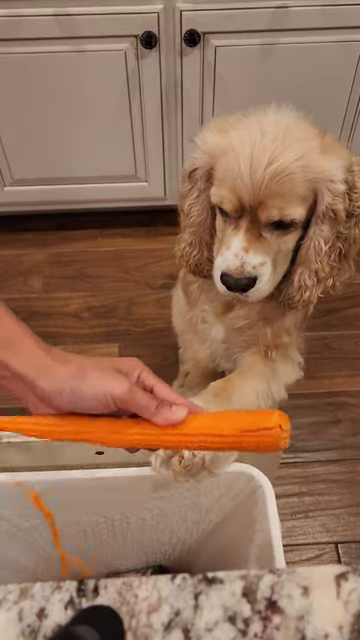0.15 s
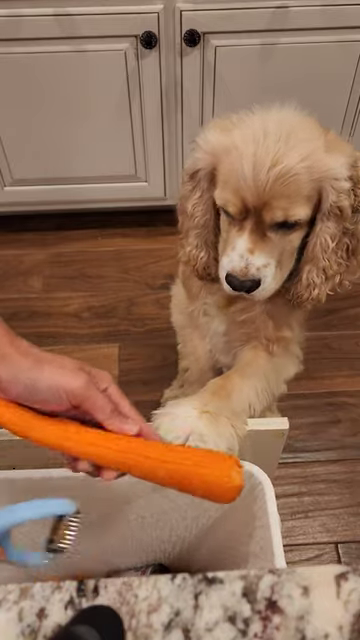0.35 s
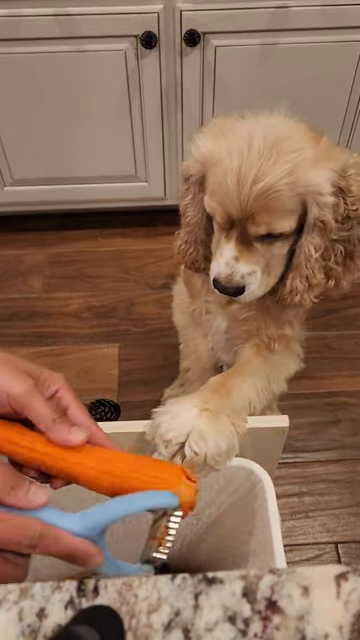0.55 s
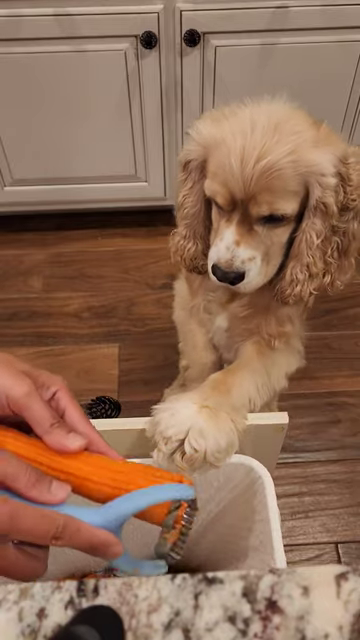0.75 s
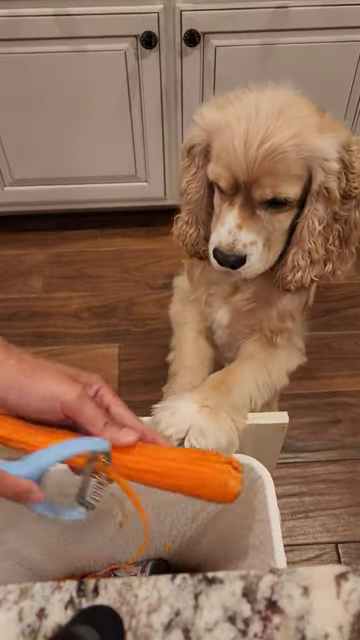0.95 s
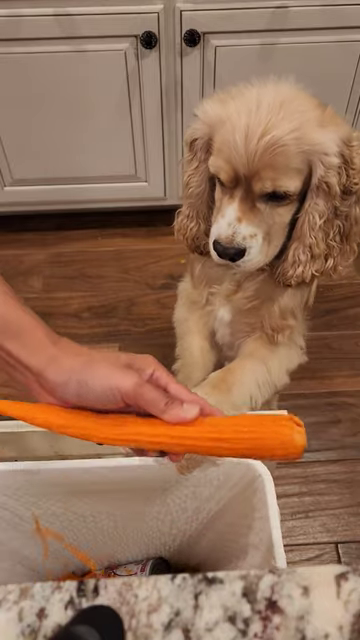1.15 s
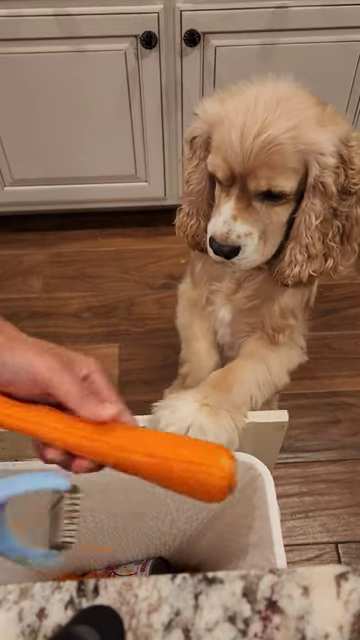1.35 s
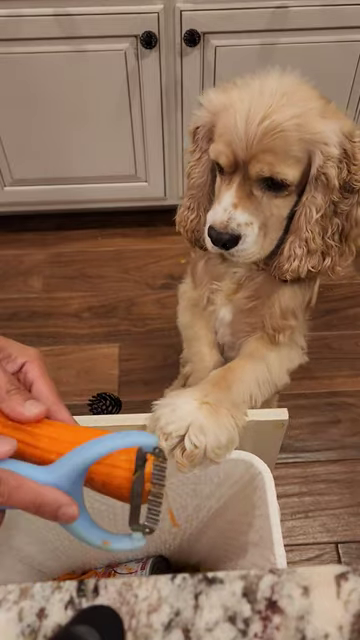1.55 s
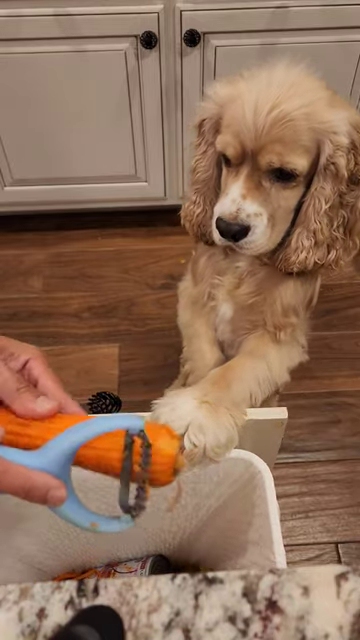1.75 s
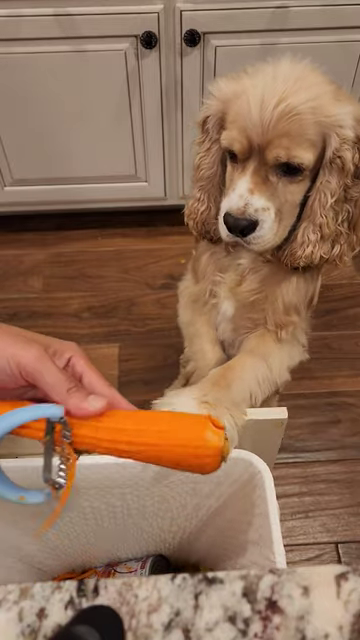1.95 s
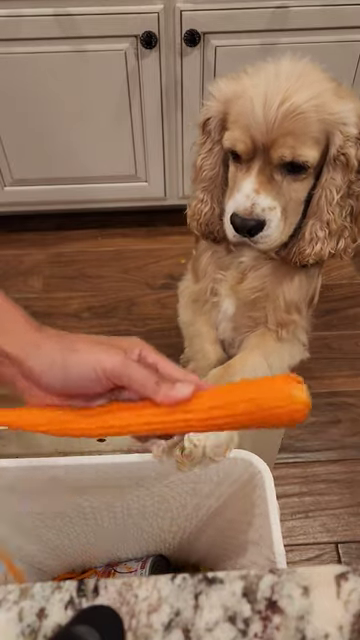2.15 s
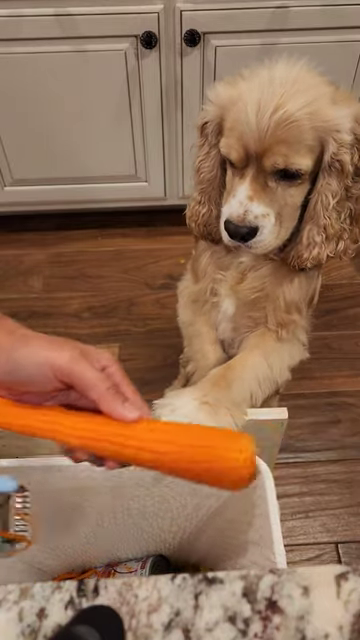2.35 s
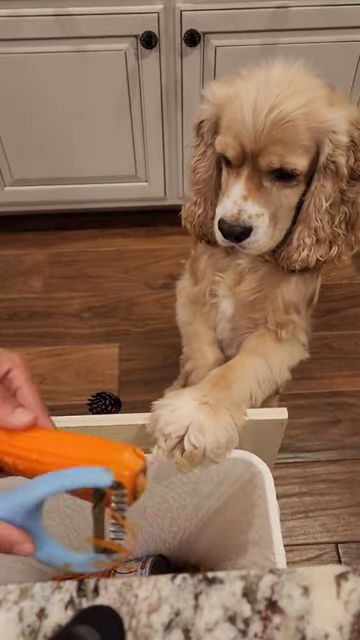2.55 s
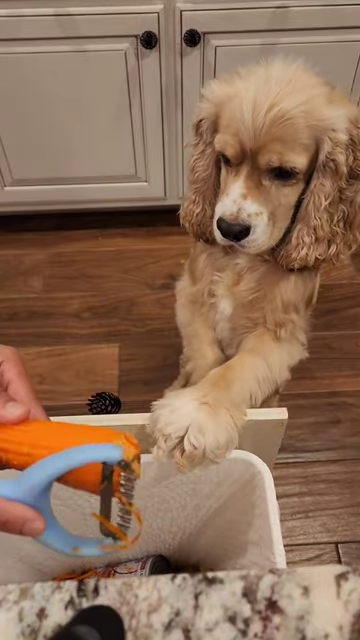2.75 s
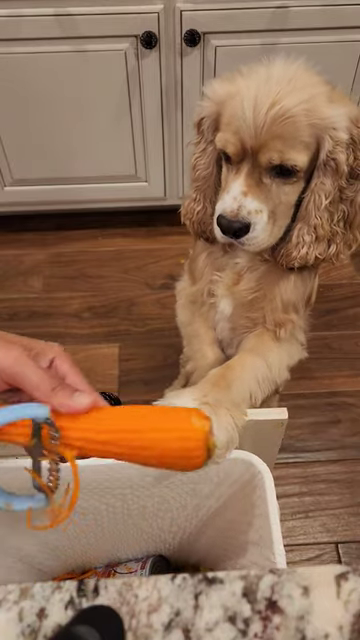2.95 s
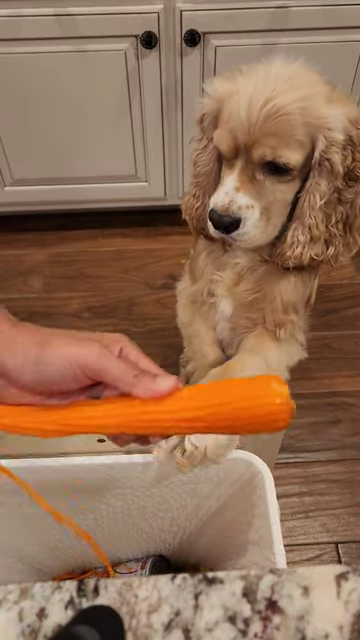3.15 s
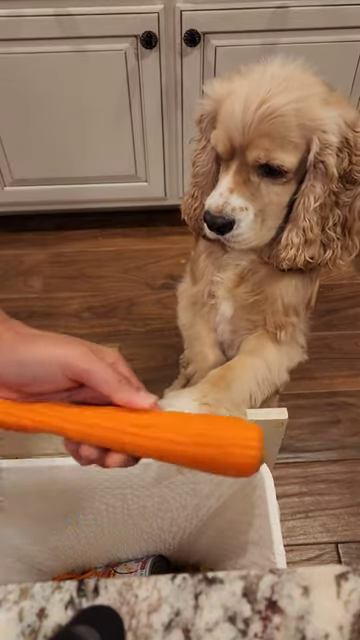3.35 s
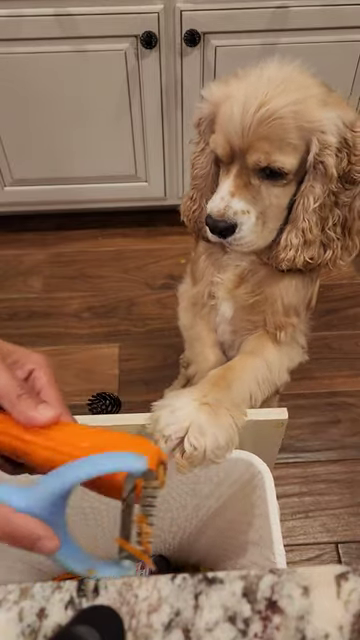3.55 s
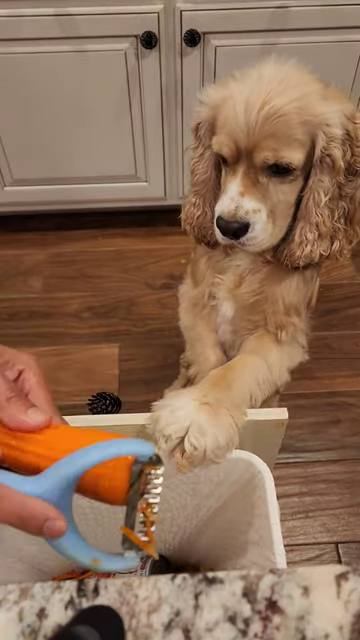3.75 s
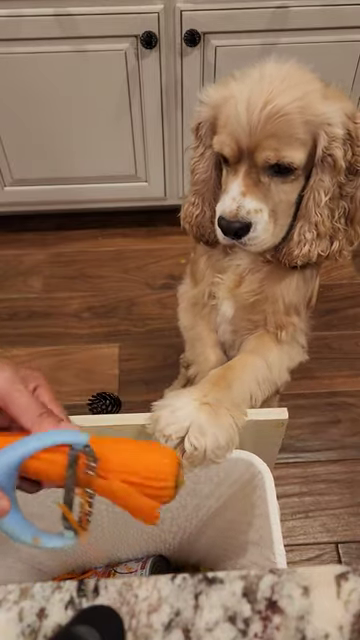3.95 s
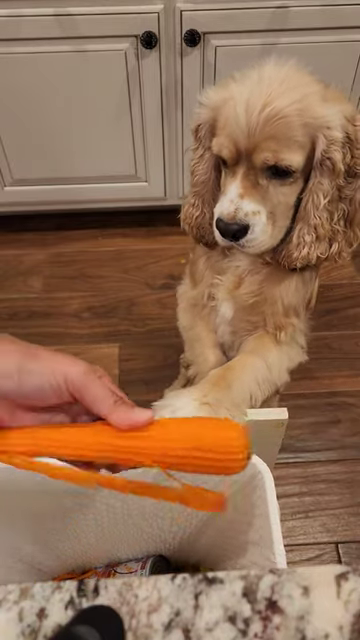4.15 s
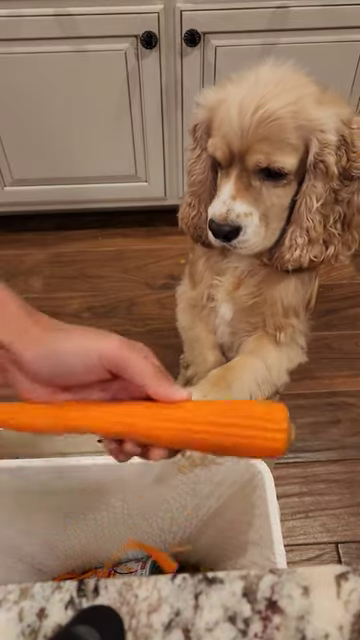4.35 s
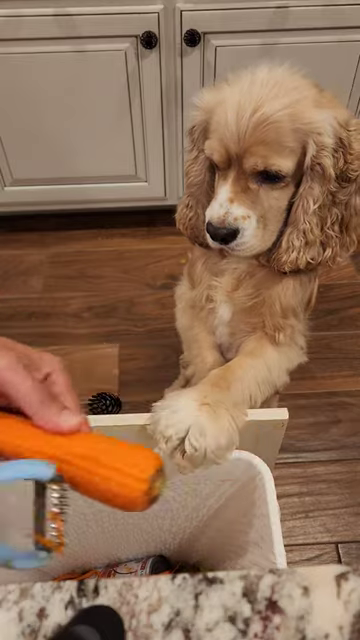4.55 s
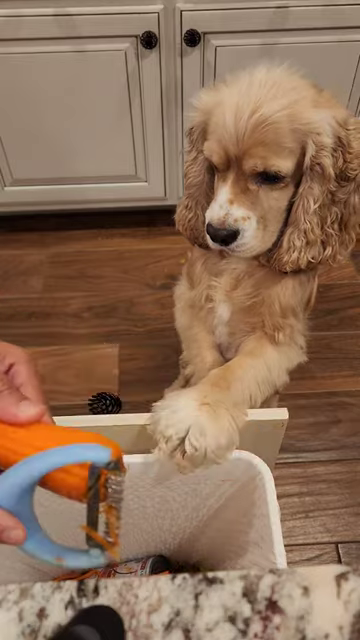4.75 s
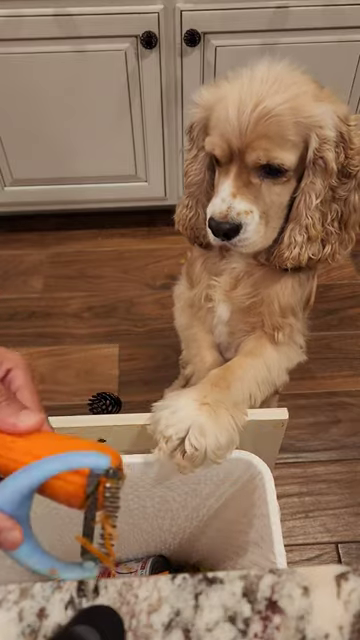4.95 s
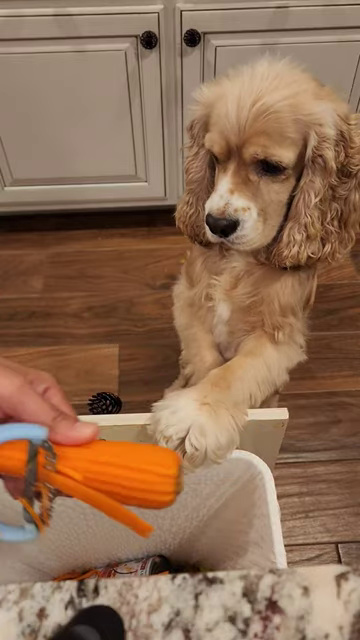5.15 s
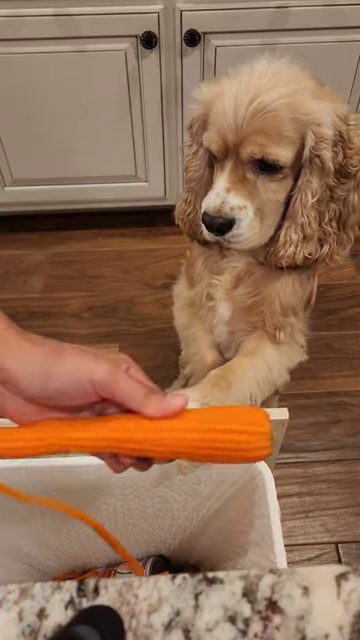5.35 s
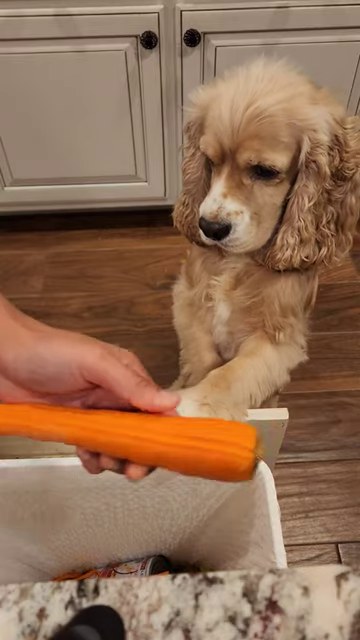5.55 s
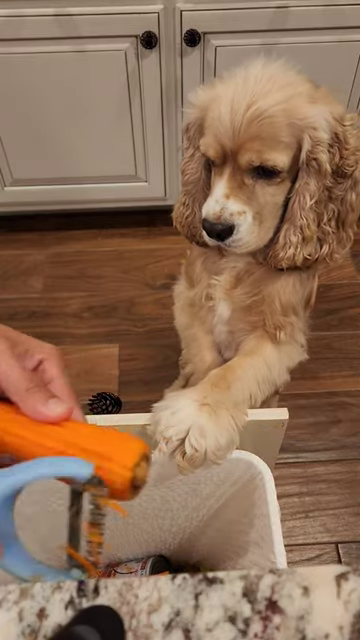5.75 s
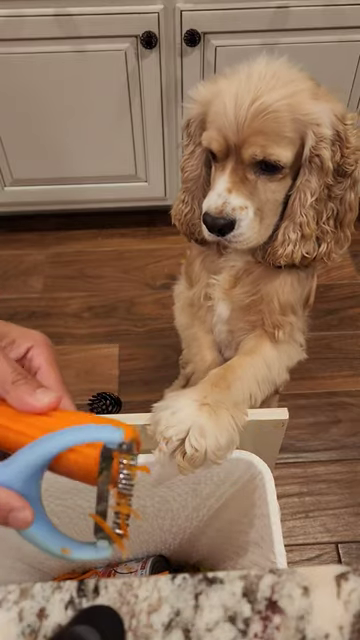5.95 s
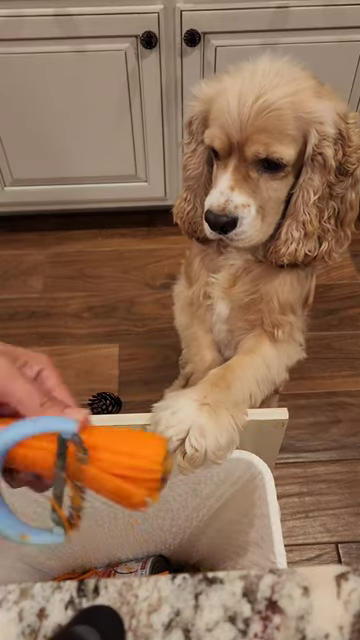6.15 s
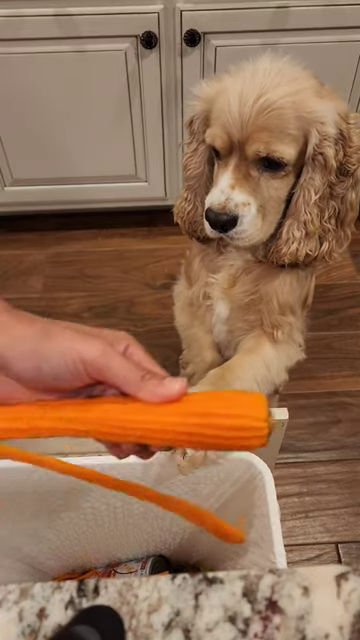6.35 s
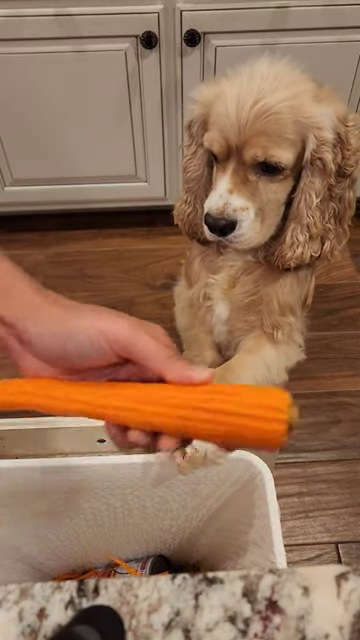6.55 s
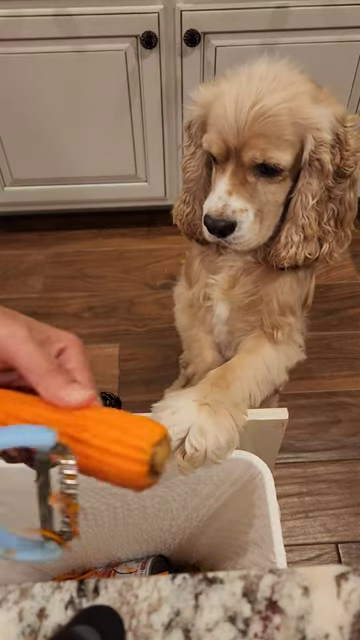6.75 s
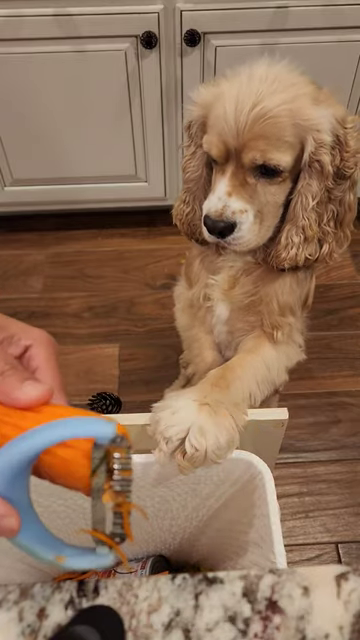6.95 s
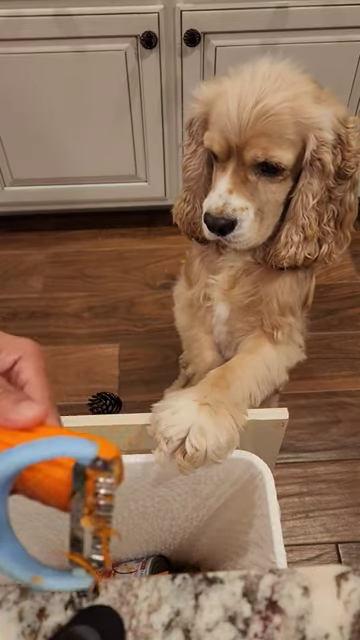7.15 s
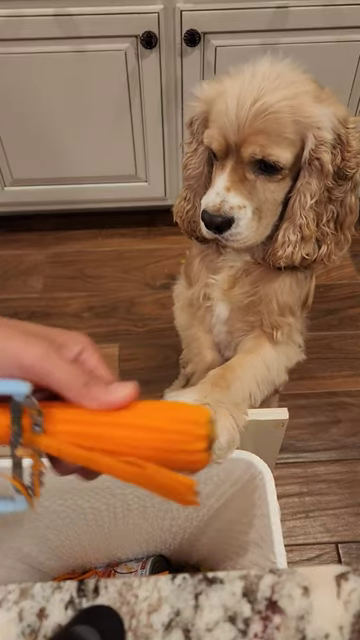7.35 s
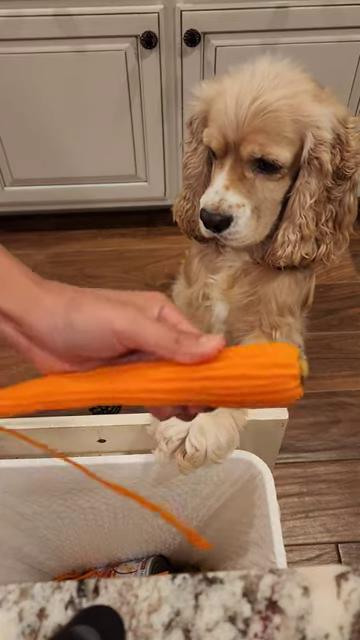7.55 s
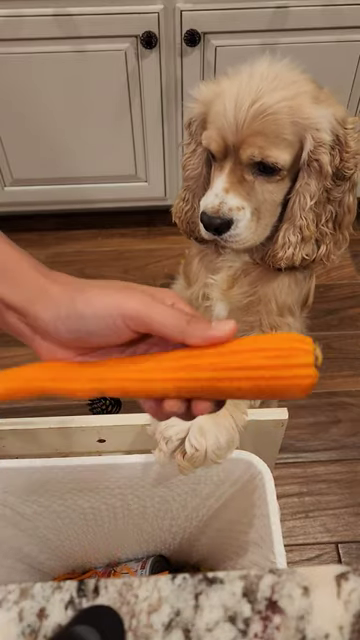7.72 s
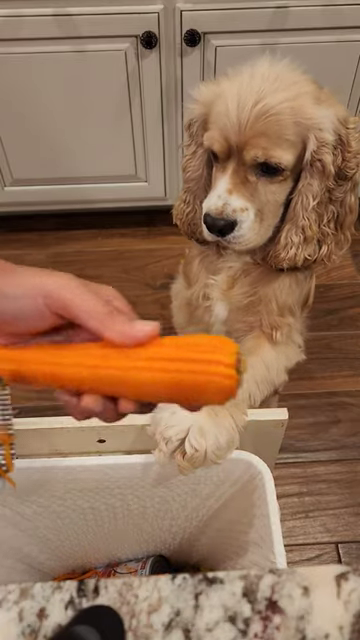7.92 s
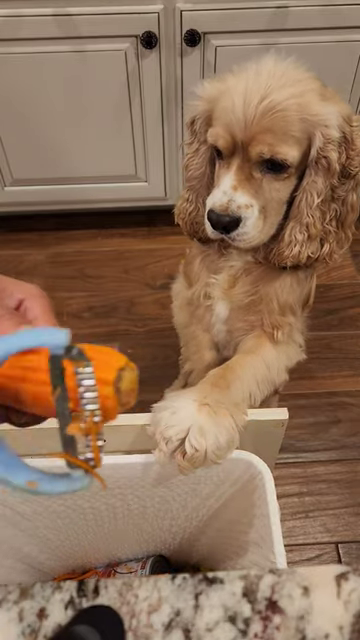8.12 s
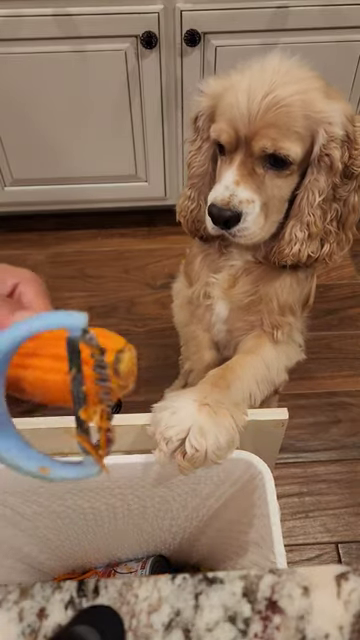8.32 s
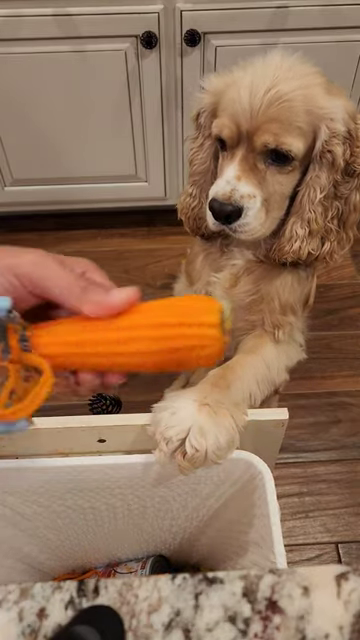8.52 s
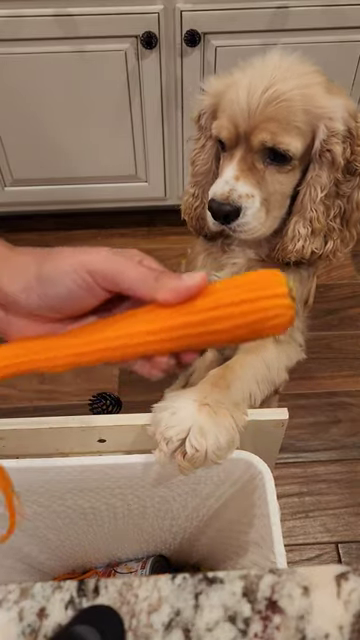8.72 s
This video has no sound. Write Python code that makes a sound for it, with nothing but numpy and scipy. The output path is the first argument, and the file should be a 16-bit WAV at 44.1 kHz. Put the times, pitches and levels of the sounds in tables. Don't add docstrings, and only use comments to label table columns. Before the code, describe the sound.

Dry, bright, crackly peeling strokes repeat steadily, each about a third of a second, separated by quiet gaps. The metal blade clicks as it lands, tough fibres snap, and strips brush or flick the plastic bin. Hollow wooden paw taps and claw slips come irregularly, and one dish sounds faintly far off. Recorded close on a stereo phone, slightly stronger on the left, in a lightly reverberant kitchen with very low hum.

```python
import sys
import numpy as np
from scipy import signal
from scipy.fft import rfft, irfft, next_fast_len
from scipy.io import wavfile
from scipy.ndimage import uniform_filter1d, map_coordinates

SR = 44100
rng = np.random.default_rng(int(sys.argv[2]) if len(sys.argv) > 2 else 0)


def to_wav(s):
    ch = np.atleast_2d(s).T
    pcm = np.round(np.clip(ch, -1, 1) * 32767)
    wavfile.write(sys.argv[1], SR, pcm.astype(np.int16))


def elevation(decibels):
    levels = np.asarray(decibels, float)
    return 10 ** (levels / 20)


N = 387198
SIDES = np.array([[1], [-1]])

# f/Hz, level/dB rms
HUM_LINES = [(80.7, -55.5), (113.0, -70)]
SHAFT_HZ, SHAFT_DB = 41, -71
# f/Hz, level/dB per Hz
AIR_SPECTRUM = [(12, -41.5), (20, -8.5), (61, -8), (91, -1), (130, 0), (293, -12), (388, -24.5),
                (759, -32.5), (873, -28), (8890, -36.5), (10800, -60), (14700, -45), (16000, -67)]
AIR_DB = -62
# t/s, peak level/dB, fall/dB per s
BUMPS = [
    (0.14, -49.5, 54),
    (1.49, -54, 50),
    (3.54, -59.5, 38),
    (3.79, -45.5, 500),
    (4.01, -57, 33),
    (4.65, -56.5, 55),
    (5.87, -53, 110),
    (6.02, -55.5, 120),
    (7.43, -43, 186.5),
    (8.7, -58, 97),
]
HANDS_DB, BUMP_RISE = -61, 1.4

ROOM_DB, ROOM_T60_S, ROOM_TREBLE_T60_S, ROOM_SPLIT_HZ = -8, 0.64, 0.24, 2300
RASP_SEND_DB, PANEL_SEND_DB = -3.5, -8
# left delay/ms, right delay/ms, level/dB
NEAR_ECHOES = [(.09, 0.2, -9.5), (.5, .33, -32.5)]
TOP_HZ = 15150

# f/Hz, level/dB, t60/s
DISH_MODES = [(285, 9, 0.535), (448, -2, 0.17), (515, 2, 0.25), (878, 2, 0.19), (1290, 1, 0.28),
              (1920, -13, 5.0)]
DISH_S, DISH_DB = 4.58, -56

# t/s, peak level/dB, panel f/Hz, contact/ms
MIDDLE_KNOCKS = [(0.5077, -42.5, 1180, 6.9), (1.4729, -38, 1070, 59), (1.5065, -26.5, 1154, 6.7),
                 (1.59, -46.5, 1090, 14), (3.546, -19, 1132, 12), (5.706, -40, 1550, 23),
                 (5.7081, -38.5, 1148, 27), (5.797, -40.5, 1090, 9.2), (5.9233, -48, 1130, 9.4),
                 (6.7535, -56.5, 1200, 26), (6.893, -51, 1110, 7.3)]
# t/s, peak level/dB, panel f/Hz, contact/ms
EDGE_KNOCKS = [(0.5328, -43.5, 1100, 5.8), (0.5494, -54, 1570, 8.1), (0.5744, -36.5, 1450, 39),
               (0.5854, -40, 1410, 9.6), (1.0785, -37, 1410, 38), (1.3418, -37.5, 1495, 19),
               (1.6576, -36, 1450, 11), (1.6694, -40, 1254, 28), (2.5415, -48, 1020, 11),
               (5.5021, -33.5, 1500, 29), (5.7537, -33.5, 1154, 9.9), (6.8079, -69, 1260, 7.7)]
# t/s, peak level/dB, panel f/Hz, contact/ms
CLAW_SLIPS = [
    (1.1528, -43, 1390, 25),
    (1.2274, -46.5, 990, 21),
    (7.3745, -50, 1020, 14),
]
# low mode level/dB, claw level/dB at a pat, claw gain/dB per dB of harder blow
KNOCK_PLACES = [(-12, -16.5, 0.87), (-4, -17, -0.9), (1.5, 6.5, 0.)]
PAT_DB, DRAWER_PAN_DB = -37, 5
PANEL_T60_S, LOW_T60_S, LOW_MODE_HZ = .026, .03, 710

# t/s, peak level/dB, centre f/Hz, relative thump/dB, rattle/ms
BLADE_TICKS = [(0.7931, -25, 4450, -13.5, 0.84), (0.8079, -27, 3630, -20, 0.72),
               (1.502, -38.5, 2980, 6.5, 0.36), (1.706, -26.5, 4500, -22, 1.1),
               (1.7118, -20, 2900, -25.5, 0.56), (2.527, -46.5, 2130, 1.5, 2.1),
               (2.7953, -35.5, 2330, -10, 1.6), (3.5387, -23.5, 2520, -5.5, 4.5),
               (3.7874, -18.5, 6900, -20, 1.3), (4.9065, -39.5, 2100, -38, 2.1),
               (4.919, -30.5, 5770, -16.5, 3.2), (6.0134, -21.5, 6670, -24, 1.47),
               (6.808, -43, 1700, -7.5, 0.31), (7.0676, -27, 5550, -19, 1.9),
               (7.3704, -32.5, 3300, -14, 1.4), (7.9235, -34.5, 3360, -12.5, 9.5),
               (8.331, -28.5, 2200, -19, 1.3), (8.337, -34.5, 3020, -26, 1.4)]
TICK_PAN_DB, CRACK = 4.5, 4
# t/s, peak level/dB, centre f/Hz, left minus right/dB
PEEL_FLICKS = [(0.3187, -31, 6100, 13), (0.3492, -36, 6060, 14), (0.402, -38, 6760, 9.5),
               (2.2788, -33.5, 6980, 4), (2.3272, -30.5, 6260, 7), (2.4155, -42.5, 5350, 6),
               (3.401, -36.5, 5260, 7.5), (3.975, -41, 2630, 6), (4.4164, -36, 2830, 4),
               (4.4718, -35, 4750, 8), (4.752, -35.5, 2370, 3), (4.7733, -55, 2210, 9),
               (5.5861, -38, 7200, 4), (5.6109, -37.5, 4140, 0.5), (5.673, -41, 5300, 12.5),
               (6.2096, -36, 2640, 3.5), (6.6058, -33, 2560, 4), (6.6876, -38.5, 5320, 6),
               (6.976, -49.5, 6100, 11.5), (7.1104, -47, 3220, 2), (7.8254, -39, 6040, 6),
               (7.857, -27.5, 8200, 4.5)]
PEEL_THUMP_DB, PEEL_RATTLE_MS = -21, 0.66
# t/s, peak level/dB, centre f/Hz, rattle/ms
FIBRE_SNAPS = [
    (4.096, -28, 9000, 1.2),
    (4.1843, -21, 10400, 6.9),
    (5.2975, -19.5, 10000, 1.3),
    (5.4026, -24, 9900, 2),
    (5.4252, -24, 9400, 1.4),
    (7.4306, -20, 8400, 0.92),
    (7.4528, -18, 9000, 2.9),
    (8.515, -34, 9560, 2.2),
    (8.596, -27, 11000, 1.8),
    (8.742, -21.5, 9000, 1.4),
]
SNAP_THUMP_DB, SNAP_PAN_DB = -50, 5
# t/s, peak level/dB, centre f/Hz, rattle/ms
PLASTIC_SCUFFS = [(2.4612, -43.5, 3200, 4.4), (4.618, -52, 9000, 1.3), (4.632, -57.5, 8450, 13),
                  (4.6815, -49, 2290, 15), (4.838, -57, 6000, 2.3), (5.178, -47, 2540, 3.7),
                  (6.849, -51, 4600, 16), (7.0209, -42, 4540, 1.3), (7.195, -45, 6100, 3.7),
                  (7.901, -41, 3310, 11), (8.415, -48.5, 9200, 65), (8.4464, -54, 2500, 3.7)]
SCUFF_THUMP_DB, SCUFF_PAN_DB = -19, 8

# t/s, hiss level/dB
STROKE_CURVES = [
    [(0.0, -53.5), (0.12, -43), (0.214, -46.5), (0.276, -55.5), (0.344, -66)],
    [(0.972, -58.5), (1.06, -45.5), (1.18, -42.5), (1.25, -48.5), (1.306, -61.5)],
    [(1.855, -66), (1.914, -51), (2.062, -47), (2.158, -46.5), (2.24, -49.5), (2.31, -63.5)],
    [(2.942, -49), (3.036, -42), (3.108, -40), (3.284, -38), (3.318, -59)],
    [(3.974, -64), (4.052, -33.5), (4.164, -37.5), (4.24, -38), (4.34, -38.5), (4.402, -60)],
    [(5.198, -54.5), (5.242, -35), (5.29, -32), (5.35, -39.5), (5.426, -34), (5.486, -42.5), (5.502, -47)],
    [(6.216, -69), (6.27, -30.5), (6.33, -27.5), (6.422, -34.5), (6.516, -37.5), (6.542, -49)],
    [(7.41, -46), (7.436, -29), (7.508, -33.5), (7.66, -42), (7.792, -80.5), (7.876, -73)],
    [(8.42, -74), (8.488, -71), (8.54, -46.5), (8.6, -35), (8.78, -38)],
]
# rip/dB, blade/dB, sizzle/dB per octave above the top band edge
STROKE_CUTS = [
    (1.5, 0.4, -3),
    (2.2, 2.5, -1.5),
    (1, 1.8, -1.5),
    (1, 0.5, 3),
    (0.2, -0.1, -5.5),
    (0.2, 0.3, -4),
    (0, -0.5, -5.5),
    (2, -2.5, -5),
    (-0.2, 3.3, 1.5),
]
TOUCH_DB_PER_S, LIFT_DB_PER_S = 802, 265
FIRM_DB, LIGHT_DB = -35, -65
RASP_EDGES_HZ = [250, 1800, 4200, 10000, 17000]
# f/Hz, level/dB per Hz
FIBRE_SPECTRUM = [(150, -49.5), (250, -13.5), (343, -13.5), (702, -11), (1270, -14), (1490, -11),
                  (3000, -11.5), (5640, -11.5), (7330, -10.5), (10000, -22), (11200, -24.5), (14500, -13.5),
                  (15600, -17.5), (16400, -62)]
# f/Hz, left minus right/dB
PORT_BALANCE = [(60, 12.5), (110, 10.5), (200, 15), (380, 3.5), (700, 5.5), (1290, 7.5), (2380, 2),
                (4400, 15), (8120, 6), (15000, 9.5)]
# firm-cut level/dB, gain/dB per dB of lost pressure, touch-to-lift drift/dB
RIP_LAYER = (-13.5, 0.55, 2)
BLADE_LAYER = (-9.5, 0.44, -8.5)
BODY_LAYER = (-20.5, 0.67, -0.69)
STROKE_LEAN = (0, .12, 1)
BLADE_HZ, BLADE_WIDTH_HZ, BLADE_DB = 2860, 1100, 10.5
PATCH_DB, PATCH_HZ, PATCH_S = 3.0, 600, .018


def unit(x):
    return x / np.sqrt(np.mean(x ** 2))


def peak(x):
    return x / np.max(np.abs(x))


def read(table, hz):
    points, db = np.transpose(table)
    return np.interp(np.log(hz + 1), np.log(points), db)


def colour(x, table):
    size = next_fast_len(x.shape[-1])
    hz = np.arange(size // 2 + 1) * SR / size
    return irfft(rfft(x, size) * elevation(read(table, hz)), size)[..., :x.shape[-1]]


def band(x, lo_hz, hi_hz, order=2):
    return signal.sosfilt(signal.butter(order, [lo_hz, hi_hz], "band", fs=SR, output="sos"), x)


def ring(x, hz, t60_s):
    pole = np.exp((2j * np.pi * hz - np.log(1000) / t60_s) / SR)
    return signal.lfilter([1], [1, -pole], x).imag


def add(out, x, s, pan_db):
    i = int(s * SR)
    x = x[..., :N - i]
    out[:, i:i + x.shape[-1]] += x * elevation(SIDES * pan_db / 2)


def walk(rate_hz):
    k = int(SR / rate_hz)
    held = np.repeat(rng.standard_normal(N // k + 1), k)
    return 1.363 * uniform_filter1d(uniform_filter1d(held, k), k)[:N]


def fridge():
    hum = 0
    for hz, db in HUM_LINES + [(SHAFT_HZ, SHAFT_DB)]:
        level = elevation(db + 0.53 * walk(11)) * np.sqrt(2)
        phase = 2 * np.pi * np.cumsum(hz + 0.592 * walk(3)) / SR
        hum = hum + level * np.sin(phase)
    mid, side = colour(rng.standard_normal((2, N)), AIR_SPECTRUM)
    side = colour(side, [(40, -23), (300, -4.0), (1500, 0.0), (16000, 1.5)])
    air = unit(mid + SIDES * side) * elevation(.8 * walk(2.9))
    return hum * elevation(SIDES * -.25) + elevation(AIR_DB) * air


def kitchen(x):
    t = np.arange(SR) / SR
    noise = rng.standard_normal((2, SR)) * (t > .007)
    low = band(noise, 290, ROOM_SPLIT_HZ, order=1) * elevation(-60 * t / ROOM_T60_S)
    high = band(noise, ROOM_SPLIT_HZ, 14000, order=1) * elevation(-60 * t / ROOM_TREBLE_T60_S)
    tail = (low + high) / np.sqrt(np.sum((low + high) ** 2) / 2)
    return signal.fftconvolve(x.mean(0)[None], tail, axes=1)[:, :N]


def handling():
    t = np.arange(N) / SR
    bumps = [top - fall * np.maximum(t - s, BUMP_RISE * (s - t)) for s, top, fall in BUMPS]
    db = np.maximum(np.max(bumps, axis=0), HANDS_DB)
    rumble = unit(band(rng.standard_normal(N), 110, 296)) * elevation(2.3 * walk(30))
    return elevation(db - 4) * rumble


def dish():
    out, t = np.zeros((2, N)), np.arange(20000) / SR
    push = rng.standard_normal(len(t)) * np.exp(-t / 0.02)
    modes = sum(elevation(db) * peak(ring(push, hz, min(t60_s, .14))) for hz, db, t60_s in DISH_MODES)
    add(out, elevation(DISH_DB) * modes, DISH_S, 0)
    return out


def drawer():
    modes, rattle, t = np.zeros((2, N)), np.zeros((2, N)), np.arange(6000) / SR
    tables = (MIDDLE_KNOCKS, EDGE_KNOCKS, CLAW_SLIPS)
    knocks = [(*row, *place) for table, place in zip(tables, KNOCK_PLACES) for row in table]
    for s, db, hz, contact_ms, low_db, pat_claw_db, harder in knocks:
        claw_db = pat_claw_db + harder * max(db - PAT_DB, 0)
        noise = rng.standard_normal((3, len(t)))
        touch = np.exp(-(1000 * t / contact_ms) ** 2) * np.minimum(t / 0.0023, 1)
        shake = (noise[0] + .6 * noise[1:]) * (touch + .1 * np.exp(-t / .045))
        panel = peak(ring(noise[0] * touch, hz, PANEL_T60_S))
        low = peak(ring(noise[1] * touch, LOW_MODE_HZ, LOW_T60_S))
        wood = 0.61 * peak(band(shake, 1000, 2260))
        wood = wood + 0.071 * elevation(low_db / 2) * peak(band(shake, 230, 400))
        claw = elevation(claw_db) * peak(band(shake, 1300, 4600, order=1))
        add(modes, elevation(db) * (0.98 * panel + 0.85 * elevation(low_db) * low), s - .003, DRAWER_PAN_DB)
        add(rattle, elevation(db) * (wood + claw), s - .003, DRAWER_PAN_DB)
    return modes, rattle


def ticks():
    out, t = np.zeros((2, N)), np.arange(2400) / SR - .004
    rows = [(*r[:4], TICK_PAN_DB, r[4]) for r in BLADE_TICKS]
    rows += [(*r[:3], PEEL_THUMP_DB, r[3], PEEL_RATTLE_MS) for r in PEEL_FLICKS]
    rows += [(*r[:3], SNAP_THUMP_DB, SNAP_PAN_DB, r[3]) for r in FIBRE_SNAPS]
    rows += [(*r[:3], SCUFF_THUMP_DB, SCUFF_PAN_DB, r[3]) for r in PLASTIC_SCUFFS]
    for s, db, hz, thump_db, pan_db, rattle_ms in rows:
        noise = rng.standard_normal((3, len(t)))
        noise[0] += CRACK * (np.abs(t) < .5 / SR)
        fall = np.where(t < 0, 0.23 * np.exp(t / 0.0057), np.exp(-1000 * t / rattle_ms))
        fall = fall + 0.25 * elevation(-.3 * (db + 24)) * (t > .007) * np.exp(-t / 0.007)
        push = (noise[0] + .5 * SIDES * noise[1]) * fall
        crack = band(push, hz / 1.57, hz * 1.38)
        crack = crack + 1.2 / max(rattle_ms, 1) * band(push, 1700, 8400, order=1)
        thump = band(noise[2] * fall, 250, 1500)
        add(out, elevation(db) * (peak(crack) + elevation(thump_db) * peak(thump)), s - .004, pan_db)
    return out


def near(x):
    out = x.copy()
    for left_ms, right_ms, db in NEAR_ECHOES:
        for side, ms in enumerate((left_ms, right_ms)):
            lag = int(ms * SR / 1000) + 1
            out[side, lag:] += elevation(db) * x[side, :-lag]
    return out


def pair(apart):
    mid, side = rng.standard_normal((2, N))
    return mid + apart * SIDES * side


def bursts(per_s, spread_db, decay_ms):
    chance = rng.random((2, N))
    breaks = (chance[0] < per_s / SR) * elevation(-2 * spread_db * np.log(1 - .995 * chance[1]))
    fall = np.exp(-1000 / (decay_ms * SR))
    power = signal.lfilter([1], [1, -fall], breaks)
    return power / power.mean()


def patches(hz, s):
    knots = rng.standard_normal((int(SR / 400), int(N / SR * 100)))
    places = np.meshgrid(hz / PATCH_HZ, s / PATCH_S, indexing="ij")
    return PATCH_DB * map_coordinates(knots, places, order=1)


def pressure(s):
    db, gone, cut_db = np.full(len(s), -120.), np.zeros(len(s)), np.zeros((3, len(s)))
    for stroke, cut in zip(STROKE_CURVES, STROKE_CUTS):
        times, levels = np.transpose(stroke)
        fade = TOUCH_DB_PER_S * np.maximum(times[0] - s, 0)
        fade = fade + LIFT_DB_PER_S * np.maximum(s - times[-1], 0)
        own = np.interp(s, times, levels) - fade
        gone = np.where(own > db, np.interp(s, times[[0, -1]], [0, 1]), gone)
        cut_db[:, own > db] = np.array(cut)[:, None]
        db = np.maximum(db, own)
    return db, gone, cut_db


def peeler():
    hz, s = np.arange(129) * SR / 256, np.arange(N // 64 + 2) * 64 / SR
    hiss_db, gone, (rip_cut_db, blade_cut_db, sizzle_db) = pressure(s)
    slack_db = FIRM_DB - np.maximum(hiss_db, LIGHT_DB)
    rip_db, blade_db, body_db, pan_db = (
        db + gain * slack_db + drift * gone
        for db, gain, drift in (RIP_LAYER, BLADE_LAYER, BODY_LAYER, STROKE_LEAN))
    resonance_db = BLADE_DB * np.exp(-((hz - BLADE_HZ) / BLADE_WIDTH_HZ) ** 2)
    shape = elevation(read(FIBRE_SPECTRUM, hz) + resonance_db)
    lean_db = read(PORT_BALANCE, hz) - np.mean(PORT_BALANCE, axis=0)[1]
    tears = bursts(260, 2.6, 1.1)
    # level/dB, port difference, share of tears
    layers = [(body_db, .4, .4), (blade_db + blade_cut_db, .5, .6), (rip_db + rip_cut_db, .7, 1.1), (0, .65, .9)]
    out = 0
    for (db, apart, share), lo, hi in zip(layers, RASP_EDGES_HZ, RASP_EDGES_HZ[1:]):
        gate = np.sqrt(1.25 + share * tears + 0.56 * bursts(1000, 1.8, .6))
        mask = shape / np.sqrt(1 + (lo / (hz + 1)) ** 8) / np.sqrt(1 + (hz / hi) ** 8)
        cells = signal.stft(unit(pair(apart) * gate), nperseg=256, noverlap=192)[2]
        out = out + cells * (unit(mask)[:, None] * elevation(db + hiss_db)[:cells.shape[-1]])
    s = s[:out.shape[-1]]
    spread_db = SIDES[:, :, None] * (lean_db[:, None] + pan_db[:len(s)]) / 2
    octaves = np.log2(np.maximum(hz / RASP_EDGES_HZ[-2], 1))
    tilt_db = octaves[:, None] * sizzle_db[:len(s)]
    out = out * elevation(patches(hz, s) + spread_db + tilt_db)
    return signal.istft(out, nperseg=256, noverlap=192)[1][:, :N]


def scene():
    rasp = near(peeler())
    modes, rattle = drawer()
    hits = ticks() + rattle + dish()
    send = hits + elevation(PANEL_SEND_DB) * modes + elevation(RASP_SEND_DB) * rasp
    return rasp + hits + modes + elevation(ROOM_DB) * kitchen(send) + handling() + fridge()


def top_cut(x):
    return signal.sosfilt(signal.butter(12, 16550, fs=SR, output="sos"), x)


def record(dry):
    low_pass = signal.ellip(6, .3, 45, TOP_HZ, fs=SR, output="sos")
    mix = signal.sosfilt(low_pass, dry)
    return top_cut(mix)


dry = scene()
out = record(dry)
to_wav(out)
```